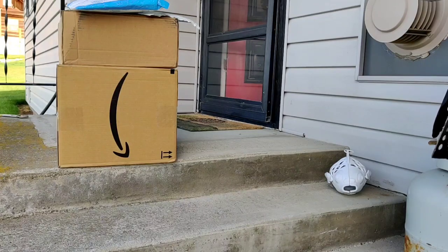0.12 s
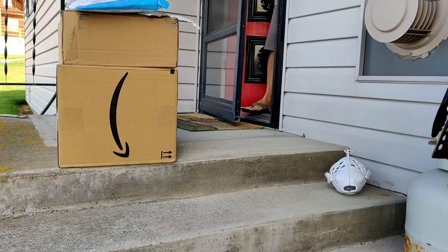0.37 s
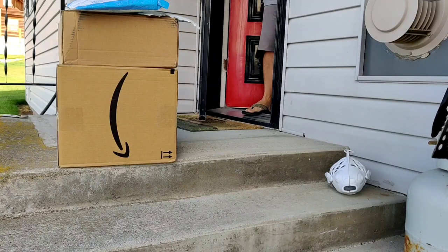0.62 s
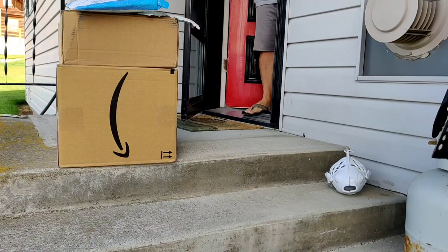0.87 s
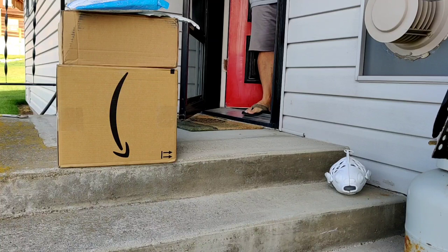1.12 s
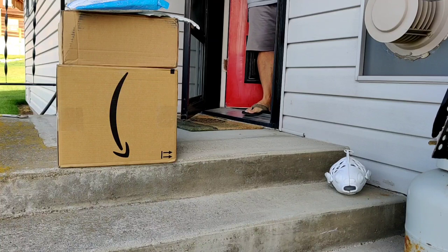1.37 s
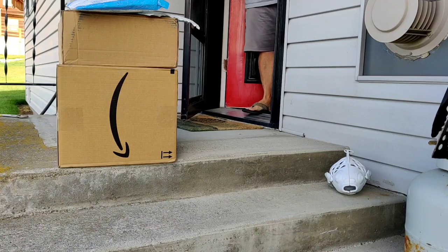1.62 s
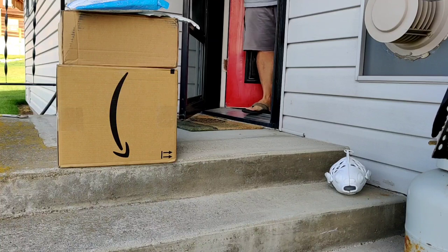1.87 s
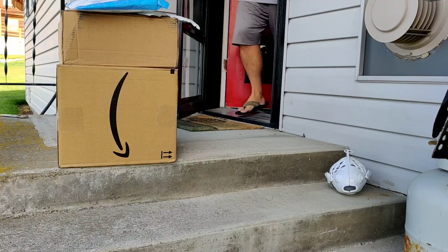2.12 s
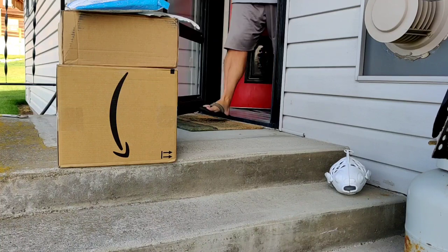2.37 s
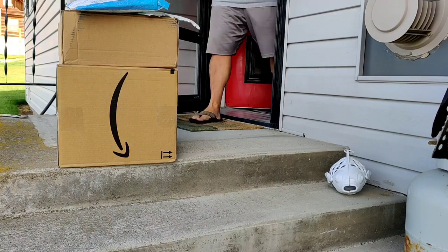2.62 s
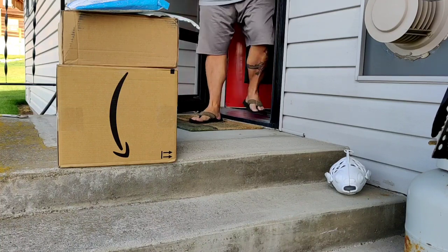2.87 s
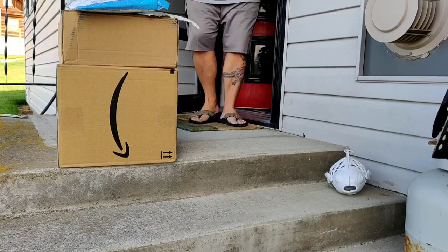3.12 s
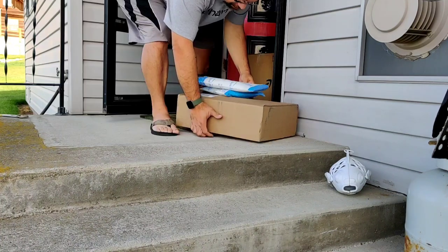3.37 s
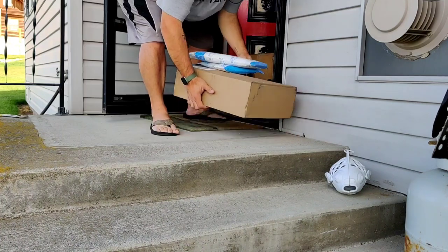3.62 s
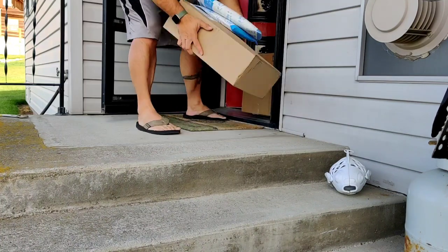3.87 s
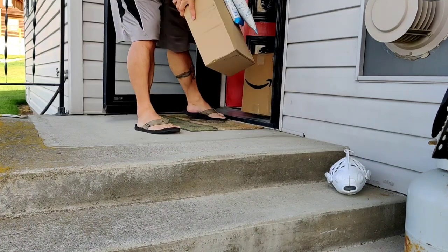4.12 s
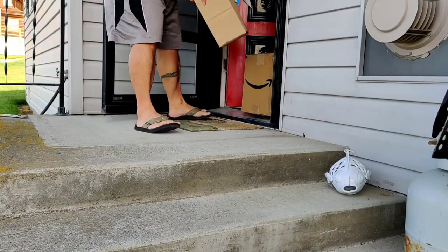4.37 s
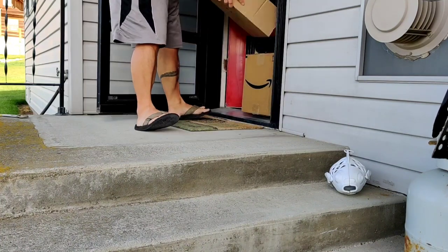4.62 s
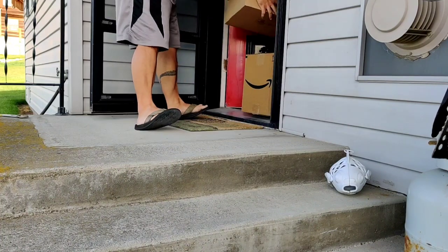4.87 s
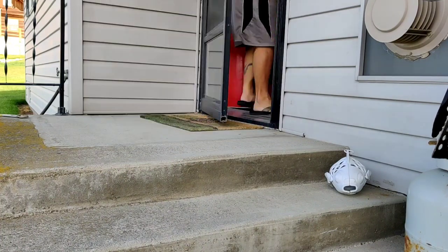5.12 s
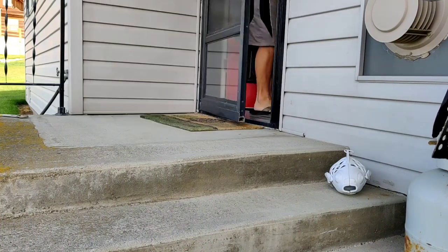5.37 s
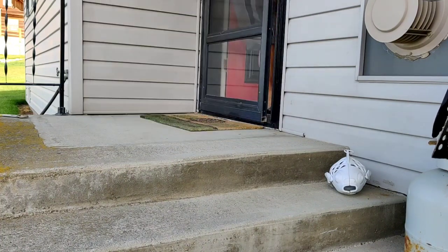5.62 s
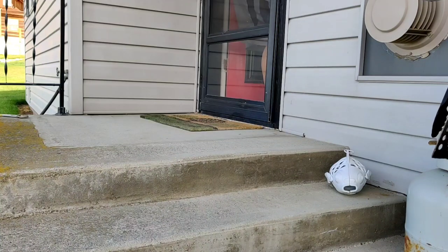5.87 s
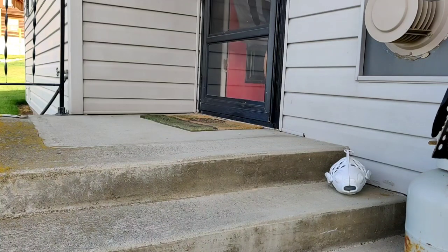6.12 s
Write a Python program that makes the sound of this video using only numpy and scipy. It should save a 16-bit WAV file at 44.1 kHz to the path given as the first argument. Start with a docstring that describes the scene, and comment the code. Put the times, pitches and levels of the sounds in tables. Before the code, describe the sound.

On a concrete porch, a storm door latch clacks open over a low engine idle, with sparse faint ticks and a brief falling hinge squeak. The engine cuts out, cardboard and plastic packages scrape and rustle, a box lands with a dull thud, and the door bangs shut with rattling metal and glass. Close outdoor stereo microphone with soft air and a short porch echo.

```python
"""An engine idles nearby as a light metal storm door unlatches, rattles and squeaks, and at last bangs shut.
Cardboard boxes and plastic mailers scrape and rustle, and a box thuds down; soft outdoor air lies beneath. The
engine is a sum of tones heard only in the first half; air, rubbing and rattle are coloured noise. Door contacts
are noise bursts through resonances, the squeak a falling tone, the thud ringing modes. A porch with concrete
steps answers the door and the box."""
import sys
import numpy as np
from scipy import signal
from scipy.fft import rfft, irfft, next_fast_len
from scipy.io import wavfile
from scipy.ndimage import map_coordinates

SR = 44100
rng = np.random.default_rng(int(sys.argv[2]) if len(sys.argv) > 2 else 0)


def linear_from_db(decibels):
    """Turn decibels (scalar or array-like) into linear amplitude factors; 0 gives 1."""
    return 10 ** (np.asarray(decibels, float) / 20)


def dump(signal):
    """Clip the signal to [-1, 1] and save it as 16-bit WAV at the path in sys.argv[1]."""
    limited = np.clip(np.atleast_2d(signal).T, -1, 1)
    pcm = np.round(limited * 32767).astype(np.int16)
    wavfile.write(sys.argv[1], SR, pcm)


N = 276066

# idling engine over time: time_s, cycle_rate_hz, firing_level_db (before the order's own level)
ENGINE_IDLE = [(0.0, 26.1, -42), (0.22, 25.99, -31.5), (0.48, 25.8, -37.5), (1.04, 26.27, -38),
               (1.88, 25.95, -37), (2.31, 26, -32), (2.67, 25.8, -29), (3.13, 25.87, -31),
               (3.4, 26.02, -49.5)]
# the door frame's resonances: centre_hz, width_hz, level_db
FRAME_MODES = [(1014, 330, -4), (1850, 26, -13), (2160, 57, -7), (3770, 290, 8.5), (4680, 180, 2),
               (5650, 28, -9), (6700, 250, -20), (7560, 150, -2), (7500, 860, 2), (9850, 96, -31.5),
               (9500, 120, -26.5)]
# left-right likeness of the door's noise: frequency_hz, likeness (-1 to 1)
DOOR_ALIKE_BY_HZ = [(60, 0.33), (240, 1), (950, 0.89), (3770, 0.5), (15000, -0.28)]
# panel, frame, latch and glass edge of the door: low_hz, high_hz
DOOR_PARTS = [(350, 1300), (1300, 2900), (2900, 5200), (5400, 16000)]


def unit(x):
    """Scaled to rms 1."""
    return x / np.sqrt(np.mean(x ** 2) + 1e-20)


def along(points, hz):
    """Reads (Hz, value) points on a log frequency axis."""
    f, v = np.transpose(points)
    return np.interp(np.log(hz + 1), np.log(f + 1), v)


def curves(rows):
    """One value per sample for each column after the time."""
    s, *cols = np.transpose(rows)
    return [np.interp(np.arange(N) / SR, s, c) for c in cols]


def during(rows, fade):
    """1 while a table lasts, fading to 0 outside it over fade seconds."""
    t = np.arange(N) / SR
    return np.clip(np.minimum(t - rows[0][0], rows[-1][0] - t) / fade + 1, 0, 1)


def wobble(rate, size=N):
    """A smooth random curve, rate knots a second."""
    knots = rng.standard_normal(int(size * rate / SR) + 4)
    return map_coordinates(knots, [np.arange(size) * rate / SR])


def filtered(x, response):
    """x times a complex response of frequency."""
    m = next_fast_len(x.shape[-1] + 8192)
    spectrum = rfft(x, m) * response(np.fft.rfftfreq(m, 1 / SR))
    return irfft(spectrum, m)[..., :x.shape[-1]]


def band(lo_hz, hi_hz, order=2):
    """A band-pass with flat top."""
    return lambda f: 1 / np.sqrt((1 + (lo_hz / (f + 1)) ** (2 * order)) * (1 + (f / hi_hz) ** (2 * order)))


def modes(table):
    """Response of (Hz, width Hz, dB) resonances, added with alternating sign."""
    def response(f):
        total = 0
        for k, (centre, width, db) in enumerate(table):
            damping = 1j * f * width
            total = total + (-1) ** k * linear_from_db(db) * damping / (centre * centre - f * f + damping)
        return total
    return response


def frame(plain):
    """The frame's resonances, struck at new strengths, over a plain share."""
    struck = [(hz, width, db + rng.normal(0, 4)) for hz, width, db in FRAME_MODES]
    return lambda f: modes(struck)(f) + plain


def rush(colour, alike, grit_db=0, size=N):
    """Stereo noise of rms 1; grit_db roughens it into grains about 2 ms long."""
    pair = rng.standard_normal((2, size)) * linear_from_db(grit_db * wobble(500, size=size))
    turn = lambda hz: np.arccos(np.clip(along(alike, hz), -1, 1)) / 2  # shares power between mid and side
    mid, side = filtered(pair, lambda hz: colour(hz) * [np.cos(turn(hz)), np.sin(turn(hz))])
    return unit(np.array([mid + side, mid - side]))


def swells(rows, rise, fall):
    """Two gains from (s, hold s, dB, second over first dB) rows: steady rise, hold and steady fall in dB."""
    t = np.arange(N) / SR
    power = 0
    for s, hold, db, second_db in rows:
        drop_db = np.maximum(0, np.maximum(rise * (s - t), fall * (t - s - hold)))
        power = power + linear_from_db(np.array([[db], [db + second_db]]) - drop_db) ** 2
    return np.sqrt(power)


def slam():
    """How hard the shut door shudders as the panel meets the frame: a gain that rises and falls."""
    # shudders: peak_s, level_db, rise_db_per_s, fall_db_per_s
    shudders = [(5.578, -37, 600, 182), (5.876, -25.5, 109, 40.5)]
    return sum(swells([(s, 0, db, 0)], rise, fall)[0] for s, db, rise, fall in shudders)


def air():
    """Far hiss over a slow low rumble, pushed about by door and boxes; the house front roars at the slam."""
    # colour of the hiss: frequency_hz, level_db
    hiss_colour = [(100, -10), (170, -6.5), (318, -14), (522, -19.5), (694, -16.5), (764, -22), (1380, -24),
                   (1980, -19.5), (2840, -23.5), (3990, -24.5), (7200, -36), (14800, -35), (16000, -47)]
    # colour of the deep rumble: frequency_hz, level_db (per Hz)
    deep_colour = [(8, -25), (18, -1), (50, -7), (70, -14), (100, -58)]
    # colour of the upper rumble: frequency_hz, level_db (per Hz)
    upper_colour = [(40, -33), (65, 7.5), (130, 0.5), (230, -3), (500, -11), (1000, -60)]
    # left-right likeness of the hiss: frequency_hz, likeness (0 to 1)
    far_alike = [(60, 0.73), (240, 0.87), (950, 0.3), (3770, 0), (15000, 0)]
    # level dips of the background, short or up to a second, some just after loud sounds:
    # middle_s, hiss_db, rumble_db, length_s
    level_dips = [(1.26, -1.5, -2, 1), (3.715, -2, -11, 0.15), (4.584, -2, -1, 0.61), (5.43, -3, -17, 0.12)]
    # door and boxes push air: start_s, hold_s, deep_level_db, upper_over_deep_db
    pushes = [(0.12, 0.12, -29.5, -3.5), (.33, 0.1, -38.5, -2.5), (2.95, 0.058, -32, -7.5),
              (3.16, 0, -37.5, -13), (3.44, 0.0086, -40.5, 10.5), (3.56, 0.061, -43, -22),
              (5.28, 0.028, -38.5, -6), (5.81, 0.0053, -19.5, -13), (5.93, 0.0098, -23, -1.5),
              (6.12, .14, -38, -7.5)]
    hiss_db, deep_db, upper_db, engine_rumble_db = -47.5, -43, -54.5, -54.5
    roar_db = -4  # relative to the slam's gain
    push_rise_db_s, deep_fall_db_s, upper_fall_db_s = 132, 70, 152

    t = np.arange(N) / SR
    dip_db = sum(np.outer([hiss_dip_db, rumble_dip_db], np.exp(-(2 * (t - s) / length) ** 2))
                 for s, hiss_dip_db, rumble_dip_db, length in level_dips)
    hiss_dip, rumble_dip = linear_from_db(dip_db)
    deep_push, upper_push = swells(pushes, push_rise_db_s, np.array([[deep_fall_db_s], [upper_fall_db_s]]))
    deep_gain = np.hypot(linear_from_db(deep_db), deep_push) * rumble_dip
    steady_upper = linear_from_db(upper_db) + linear_from_db(engine_rumble_db) * during(ENGINE_IDLE, .05)
    upper_gain = np.hypot(steady_upper, upper_push) * rumble_dip
    sway = linear_from_db(.7 * wobble(3))
    hiss_gain = np.hypot(linear_from_db(hiss_db) * hiss_dip, linear_from_db(roar_db) * slam()) * sway
    hiss = hiss_gain * rush(lambda f: linear_from_db(along(hiss_colour, f)), far_alike)
    deep = deep_gain * rush(lambda f: linear_from_db(along(deep_colour, f)), [(50, .997)])
    upper = upper_gain * rush(lambda f: linear_from_db(along(upper_colour, f)), [(150, 0.89)])
    return hiss + deep + upper


def engine():
    """Orders of the cycle rate add up to pulses; the fourth, one per firing, is the strong hum."""
    # orders: multiple of the cycle rate, level_db (relative)
    orders = [(1, -49), (2, -7.5), (3, -6), (4, -0.5), (5, -6), (6, -6.5), (7, -43), (8, -20), (9, -40),
              (10, -65), (11, -30.5), (12, -35), (13, -64.5), (14, -72), (15, -56.5), (16, -21)]
    # the other orders' base level, their share of the firing tone's swings above idle, and that idle level
    other_base_db, other_follows, idle_db = -41, 0.46, -38

    hz, firing_db = curves(ENGINE_IDLE)
    other_db = other_base_db + other_follows * np.maximum(0, firing_db - idle_db)
    cycle = 2 * np.pi * np.cumsum(hz) / SR
    tones = 0
    for k, order_db in orders:
        unsteady_db = .4 if k == 4 else 1.3
        base_db = firing_db if k == 4 else other_db
        gain = linear_from_db(base_db + order_db + unsteady_db * wobble(4.58))
        phase_drift = .2 * unsteady_db * wobble(3)
        tones = tones + gain * np.cos(k * cycle + phase_drift)
    return np.sqrt(2) * during(ENGINE_IDLE, 0.064) * tones * linear_from_db([[.7], [-.7]])


def rubbing():
    """Gritty friction: a cardboard body and a plastic hiss above about 5 kHz."""
    # strokes: start_s, hold_s, cardboard_level_db, plastic_over_cardboard_db
    strokes = [(2.64, 0.17, -57, 5), (3.08, 0.2, -57, 1.5), (3.395, 0.079, -31, 0.5),
               (3.78, 0.17, -41.5, .5), (4.0, 0.21, -39, -1), (4.32, 0, -44.5, -14),
               (4.52, 0.0045, -52.5, -0.5), (4.84, 0.18, -45.5, -1.5), (5.04, 0.035, -39, 4),
               (5.1, 0.0033, -31.5, -2), (5.3, 0.056, -48, -4)]
    # colour of the friction: frequency_hz, level_db (per Hz)
    friction_colour = [(150, -23), (250, -11), (421, -7.5), (597, -4.5), (1060, 0.5), (1730, -1),
                       (4900, 1.5), (6040, -10.5), (7700, -7), (9490, -14.5), (14900, -12), (16000, -52)]
    # left-right likeness: frequency_hz, likeness (0 to 1)
    near_alike = [(60, 0.89), (240, 0.99), (950, 0.79), (3770, 0.21), (15000, 0.01)]

    cardboard, plastic = swells(strokes, 273, 120)  # rise and fall in dB/s
    split = lambda f: 1 / (1 + (f / 5200) ** 12)
    body = rush(lambda f: linear_from_db(along(friction_colour, f)) * split(f), near_alike, grit_db=0.5)
    hiss = rush(lambda f: linear_from_db(along(friction_colour, f)) * (1 - split(f)), near_alike, grit_db=2.0)
    flutter = linear_from_db(1.1 * wobble(45))
    return flutter * (cardboard * body + plastic * hiss * linear_from_db([[-.5], [.5]]))


def thud():
    """Each landing rings floor and box and slaps the cardboard; a soft blow leaves the high modes still."""
    # the box lands, rocks and settles: start_s, level_db (relative), hardness_hz
    landings = [(5.082, -11, 1200), (5.093, -10, 890), (5.106, -5.5, 590), (5.115, -10, 700),
                (5.133, -10, 500), (5.146, -4.5, 397), (5.155, -6.5, 500), (5.163, -10, 250)]
    # modes of box and floor: frequency_hz, level_db (relative), t60_s
    floor_modes = [(52, 2.5, 0.24), (111.6, -5.5, 0.16), (188, -4, 0.08), (290, -0.5, 0.06),
                   (360, -8.5, 0.1), (453, -18, 0.1), (738, 2, 0.048), (952, -1, 0.09), (1114, -0.5, 0.049),
                   (1450, -5.5, .05)]

    out, t = np.zeros(N + SR), np.arange(SR // 2) / SR
    attack = 1 - np.exp(-t / 0.00046)
    for s, db, hard_hz in landings:
        ring = 0
        for hz, level_db, t60 in floor_modes:
            strength = linear_from_db(rng.normal(0, 2)) / (1 + (hz / hard_hz) ** 2)
            tone = np.sin(2 * np.pi * hz * t + rng.uniform(0, 2.7))
            ring = ring + strength * linear_from_db(level_db - 60 * t / t60) * tone
        paper = unit(filtered(rng.standard_normal(len(t)), band(600, 2000)))
        slap = hard_hz / 1000 * linear_from_db(-11 - 60 * t / .07) * paper
        out[round(s * SR):][:len(t)] += linear_from_db(db - 7) * (ring + slap) * attack
    return out[:N]


def squeak():
    """A slipping hinge: a rough tone with overtones whose pitch sags ever faster."""
    start_s, hold_s, tone_db, octave_db = 2.56, .113, -48, -51
    first_hz, sag_hz_per_s, sag_hz_per_s2 = 2890, 100, 14000
    catch_hz, catch_s = 30, .014  # the pitch starts higher and drops as the hinge begins to slip

    u = np.clip(np.arange(N) / SR - start_s, -.03, .2)
    hz = first_hz + catch_hz * np.exp(-u / catch_s) - sag_hz_per_s * u - sag_hz_per_s2 * u ** 2
    tone_gain, octave_gain = swells([(start_s, hold_s, tone_db, octave_db - tone_db)], 400, 2500)
    phase = 2 * np.pi * np.cumsum(hz * (1 + .005 * wobble(250))) / SR
    tone = tone_gain * linear_from_db(3 * wobble(50)) * np.sin(phase)
    overtones = np.sin(2 * phase) + .07 * np.sin(3 * phase)
    return np.sqrt(2) * (tone + octave_gain * linear_from_db(3.5 * wobble(50)) * overtones)


def scrapes():
    """Gritty friction through one broad resonance, under a smooth stroke."""
    # scrapes that swell and fade: middle_s, level_db, length_s, centre_hz, width_hz
    strokes = [(0.219, -33.5, 0.026, 1900, 400), (0.234, -35.5, 0.013, 3000, 5930),
               (0.254, -49, 0.049, 1110, 500), (0.319, -34.5, 0.022, 3800, 1500),
               (0.321, -35.5, 0.037, 1450, 300), (2.645, -31, 0.027, 2520, 5050),
               (3.908, -42.5, 0.068, 1260, 700), (4.319, -39, 0.014, 3000, 8000),
               (4.341, -45.5, 0.13, 1490, 1210), (4.868, -45, 0.17, 494, 700),
               (5.462, -52, 0.28, 7940, 1600), (5.749, -26.5, 0.033, 1210, 890),
               (5.934, -20.5, 0.025, 2980, 4560), (6.04, -36, 0.065, 3900, 1800)]

    out = np.zeros((2, N + SR))
    u = np.arange(-SR // 4, SR // 4) / SR
    for s, db, length, hz, width in strokes:
        top_hz = 5200 if hz + width / 2 < 5400 else 16000  # those whose resonance ends below about 5.4 kHz are cut off sharply at 5.2 kHz
        colour = lambda f: modes([(hz, width, 0)])(f) ** 2 * band(20, top_hz, order=12)(f)
        grit = rush(colour, DOOR_ALIKE_BY_HZ, grit_db=3.5, size=len(u))
        i = round(s * SR) - SR // 4
        stroke = (linear_from_db(db) * np.exp(-(2 * u / length) ** 2) * grit)[:, max(0, -i):]
        out[:, max(0, i):][:, :stroke.shape[1]] += stroke
    return out[:, :N]


def rattle():
    """Dense tiny contacts keep loose glass and trim buzzing while the door is shaken."""
    # shakes: start_s, hold_s, trim_level_db, glass_over_trim_db
    shakes = [(0.24, 0.0097, -34.5, -13), (2.54, 0.14, -47, -4.5), (2.66, .2, -49, 1),
              (3.08, 0.18, -49.5, -5), (5.57, 0.068, -48, -9), (5.77, 0.051, -37, -6.5),
              (5.9, 0.071, -30.5, -0.5), (6.08, 0.089, -47, 1)]

    def buzz(lo_hz, hi_hz):
        jolts = linear_from_db(2 * wobble(40))
        colour = lambda f: (0.36 * modes(FRAME_MODES)(f) + 0.35) * band(lo_hz, hi_hz, order=5)(f)
        return jolts * rush(colour, DOOR_ALIKE_BY_HZ, grit_db=3)

    trim, glass = swells(shakes, 111, 89)  # rise and fall in dB/s
    return trim * buzz(576, 2580) + glass * buzz(*DOOR_PARTS[2])


def boom():
    """The door panel's two lowest modes, shaken at random as it meets the frame."""
    # panel modes: centre_hz, width_hz, level_db (relative, before the response is squared)
    panel_modes = [(77.3, 12.4, -4), (111.3, 18, -4.5)]
    return slam() * rush(lambda f: modes(panel_modes)(f) ** 2, [(90, .99)])


def clicks():
    """Each contact is a crack and a dying burst in four parts of the door, with one mode boosted."""
    # contacts of latch, frame and closer: start_s, level_db (relative), knock_db, bright_db, ring_hz
    contacts = [(0.068, -31, -1, -6, 2897), (0.1001, -16.5, 3, -1.5, 4700), (0.1782, -21, -7.5, -36, 4170),
                (0.3762, -29.5, -8, -30, 4150), (0.598, -40, -0.5, 1, 2184), (1.509, -37.5, 2.5, -15, 1519),
                (2.0017, -37.5, -18, -42, 1611), (2.2963, -38.5, -9, -25, 1500),
                (2.356, -41, -1, -10, 3800), (2.392, -38.5, -1, -13, 1500), (2.4309, -36.5, -9, -20, 1150),
                (2.48, -36, -2, -15, 3950), (2.5132, -35, -8, -29, 3330), (2.6903, -34, 0, -6, 3900),
                (2.7758, -34.5, -2.5, -1, 4200), (2.947, -30.5, -4, -24, 3580),
                (2.9964, -22.5, -7, 3, 4600), (3.7111, -40, -13, -23, 4800), (4.0532, -37, -20, 10, 3730),
                (4.4547, -43.5, -13, -10, 4050), (4.5158, -30, -8.5, -27, 2160),
                (4.8324, -39, -9, -15, 2080), (4.9655, -39.5, -1.5, 3, 4570), (5.457, -38, -6, -14, 4200),
                (5.514, -39, -20, -18.5, 1700), (5.5687, -26.5, -4, -17, 1430),
                (5.6054, -39, -8, -18, 3700), (5.68, -30.5, 0, -25, 1110), (5.7339, -21, -2, -6, 4030),
                (5.8102, -10.5, -6, -5.5, 1820), (5.874, -20.5, -12, -30, 4540), (5.918, -25, -4, 2, 4100),
                (6.0058, -19.5, -7, -12, 4200), (6.1065, -31.5, -15, -0.5, 4900),
                (6.1559, -35, -13.5, -2, 2760), (6.2137, -26.5, -7.5, -35, 4400),
                (6.2467, -35, -17, -0.5, 3850)]
    clink_on_latch_db, clink_elsewhere_db = 4.5, -6.5  # the latch part clinks loudest when it holds the ring
    # quieter, duller contacts are low-passed; sharp or loud ones keep their full treble
    low_pass_hz, sharp_db, loud_db = 8800, -3, -25

    t = np.arange(SR // 6) / SR
    out = np.zeros((2, N + len(t)))
    attack = 1 - np.exp(-t / 0.0017)
    fade = np.exp(-(t / .015) ** 2) + .3 * linear_from_db(-60 * t / .16)  # a short chatter, then a weaker shiver
    for s, db, knock_db, bright_db, hz in contacts:
        ring = frame(.7)
        clink_db = clink_on_latch_db if hz > DOOR_PARTS[2][0] else clink_elsewhere_db
        full_treble = bright_db > sharp_db or db > loud_db
        treble = DOOR_PARTS[3] if full_treble else (DOOR_PARTS[3][0], low_pass_hz)
        bursts = []
        for lo_hz, hi_hz in [*DOOR_PARTS[:3], treble]:
            colour = lambda f: (ring(f) + modes([(hz, 240, 6)])(f)) * band(lo_hz, hi_hz, order=8)(f)
            bursts.append(rush(colour, DOOR_ALIKE_BY_HZ, grit_db=3.0, size=len(t)))
        knock, body, clink, bright = bursts
        burst = linear_from_db(knock_db) * knock + body + linear_from_db(clink_db) * clink + linear_from_db(bright_db) * bright
        out[:, round(s * SR):][:, :len(t)] += attack * linear_from_db(db - 7.5) * fade * burst
    return out[:, :N]


def porch(x):
    """Walls and steps answer after about 9 ms; each frequency dies at its own speed."""
    # decay: frequency_hz, t60_s
    decay = [(200, 0.46), (2000, 0.17), (10000, 0.22)]
    hz, t, z = signal.stft(rng.standard_normal((2, SR // 2)), SR, nperseg=256)
    tail = signal.istft(z * linear_from_db(-60 * t / along(decay, hz)[:, None]), SR, nperseg=256)[1]
    delayed = np.pad(x, (400, 0))[None]
    return signal.fftconvolve(delayed, tail / np.linalg.norm(tail[0]), axes=1)[:, :N]


def scene():
    """All sources; the door leans to a side that varies with frequency, and echoes in the porch."""
    # where the door sits: frequency_hz, left_over_right_db
    lean = [(60, -1), (240, 3), (950, 2.0), (3770, 2), (15000, -8)]
    door = clicks() + scrapes() + squeak()
    door = door + linear_from_db(-5.5) * porch(door.mean(0)) + rattle() + boom()
    door = filtered(door, lambda f: linear_from_db(along(lean, f) / 2 * np.array([[1], [-1]])))
    box = thud()
    placed_box = box * linear_from_db([[.3], [-.3]]) + linear_from_db(-19) * porch(box)
    return door + placed_box + rubbing() + engine() + air()


def low_pass(x):
    """Removes everything above the highest recorded frequency."""
    return signal.sosfilt(signal.butter(12, 16820, fs=SR, output="sos"), x)


def record(dry):
    """The loudest peaks are rounded off and the band ends near 15.6 kHz."""
    rounded = dry / (1 + np.abs(dry / .75) ** 4) ** (1 / 4)
    mix = filtered(rounded, band(5, 15600, order=30))
    return low_pass(mix)


dry = scene()
out = record(dry)
dump(out)
```